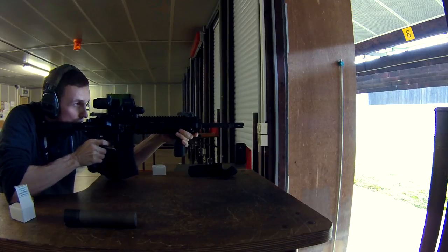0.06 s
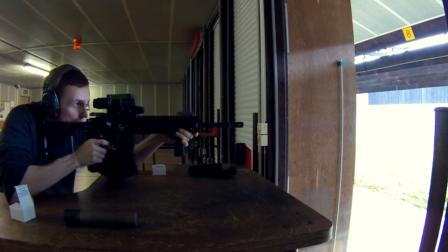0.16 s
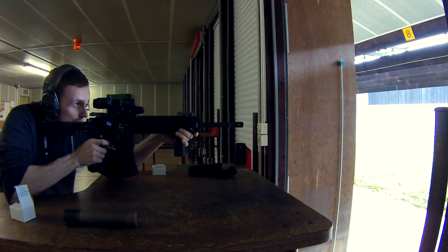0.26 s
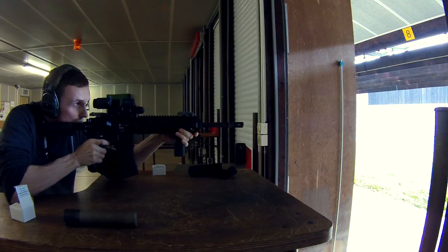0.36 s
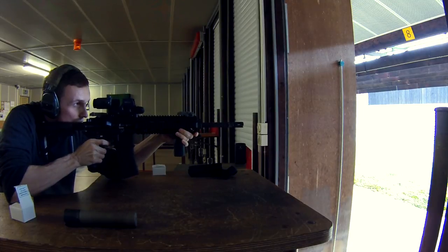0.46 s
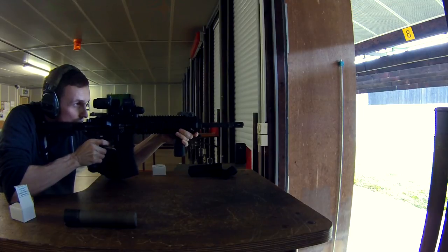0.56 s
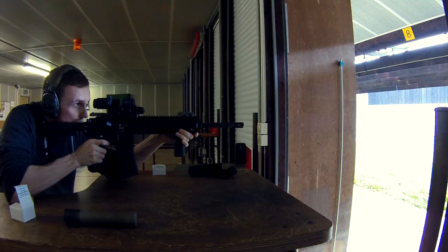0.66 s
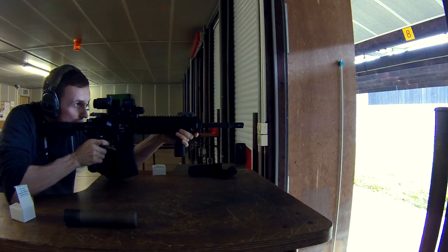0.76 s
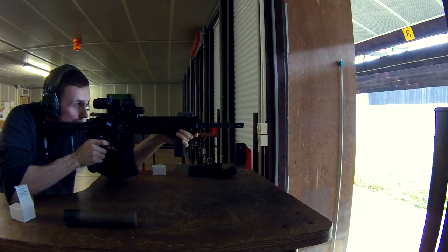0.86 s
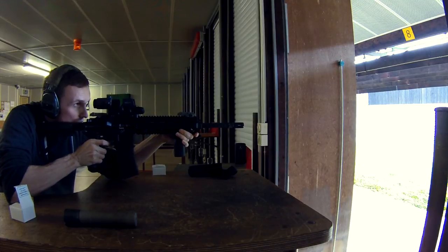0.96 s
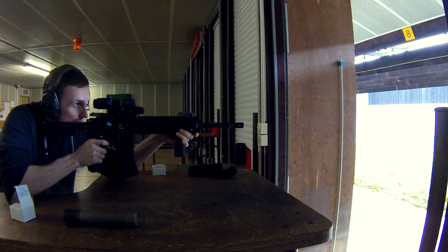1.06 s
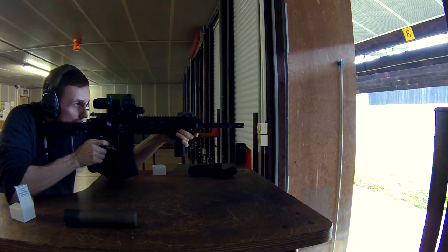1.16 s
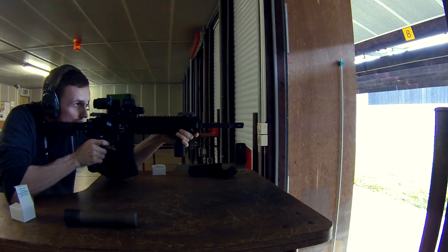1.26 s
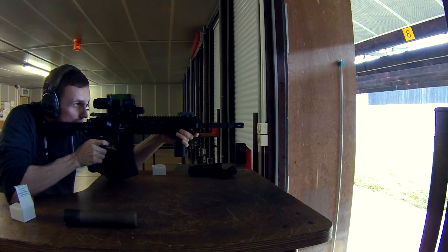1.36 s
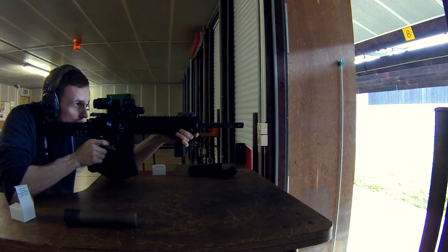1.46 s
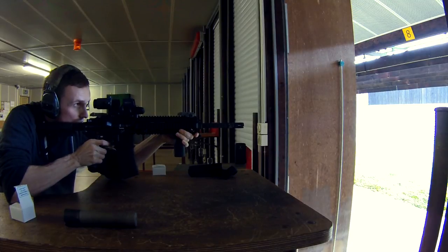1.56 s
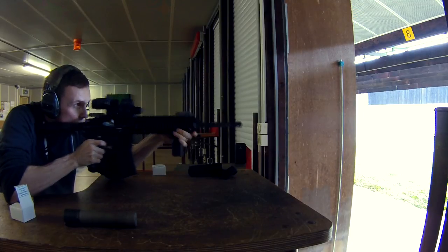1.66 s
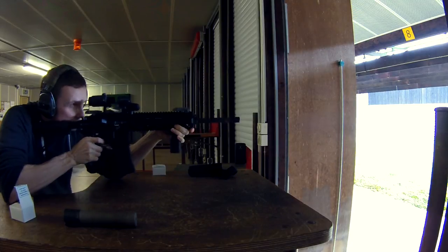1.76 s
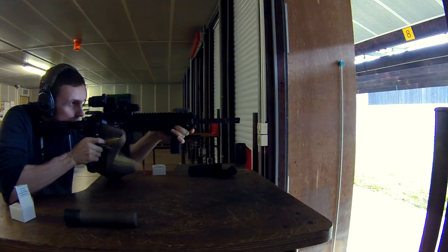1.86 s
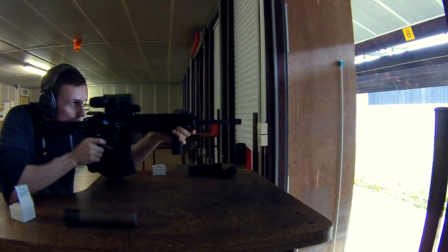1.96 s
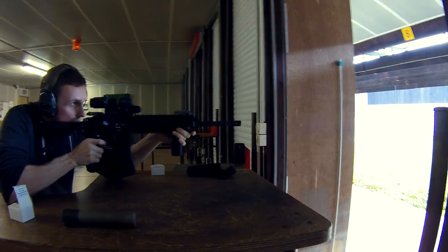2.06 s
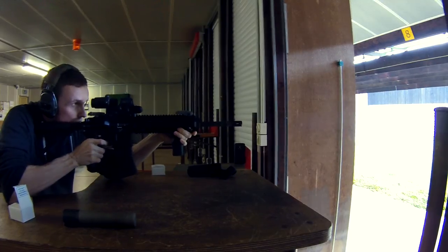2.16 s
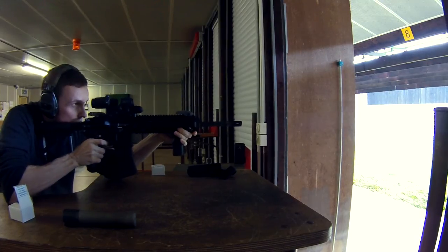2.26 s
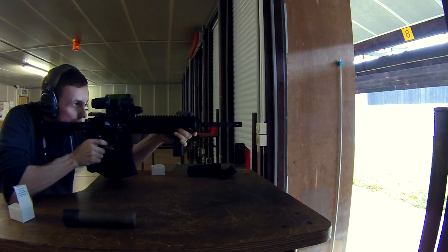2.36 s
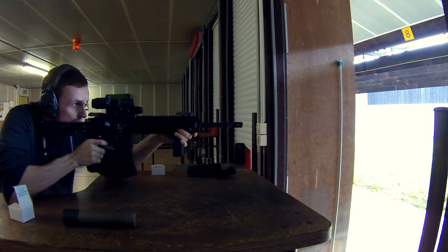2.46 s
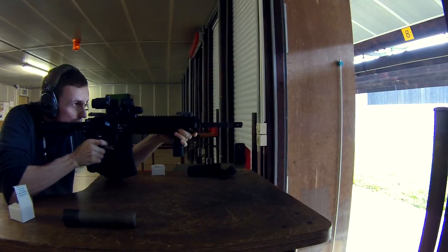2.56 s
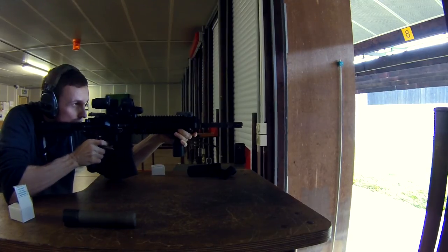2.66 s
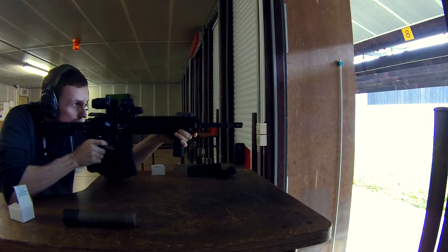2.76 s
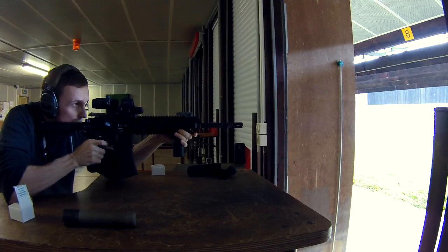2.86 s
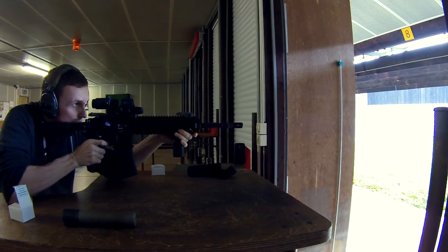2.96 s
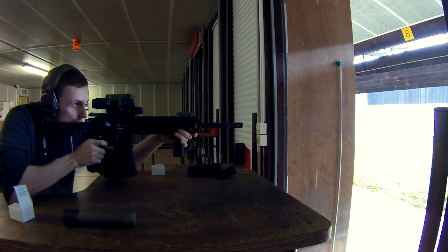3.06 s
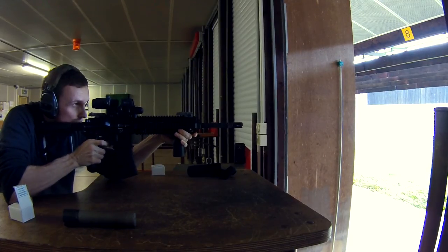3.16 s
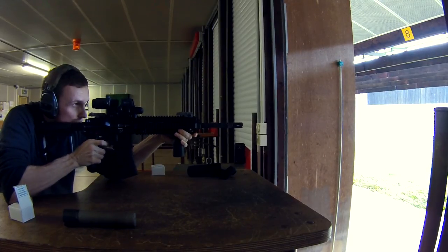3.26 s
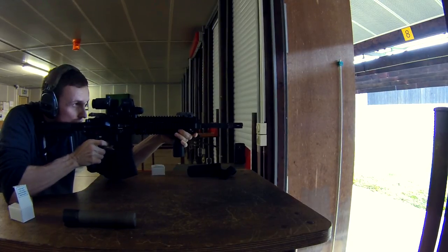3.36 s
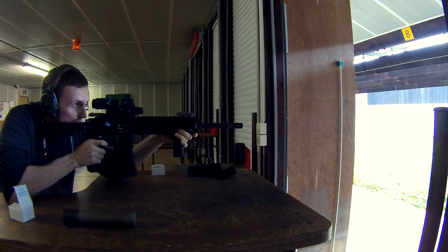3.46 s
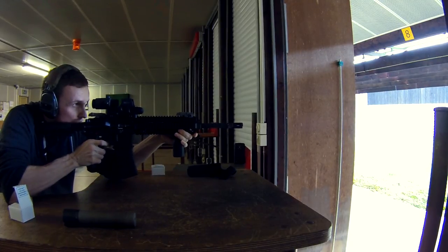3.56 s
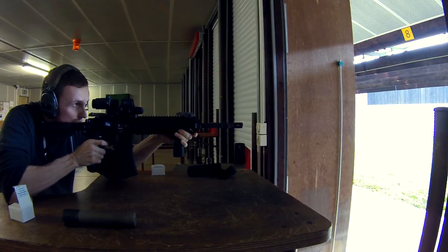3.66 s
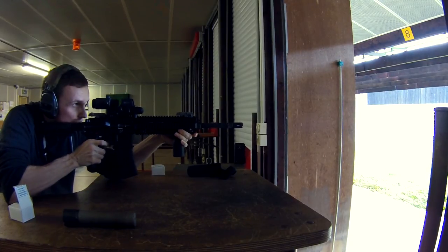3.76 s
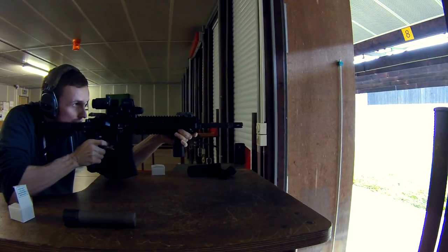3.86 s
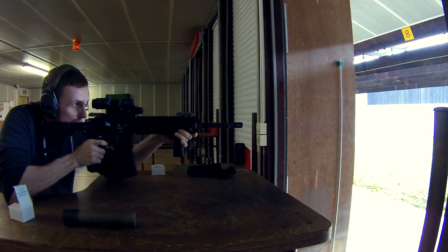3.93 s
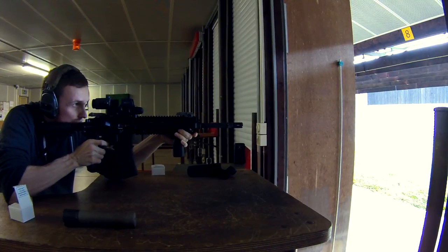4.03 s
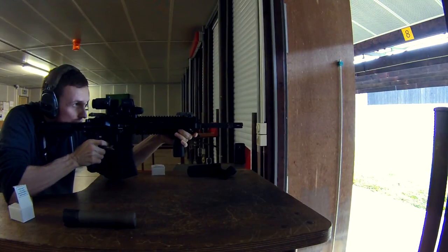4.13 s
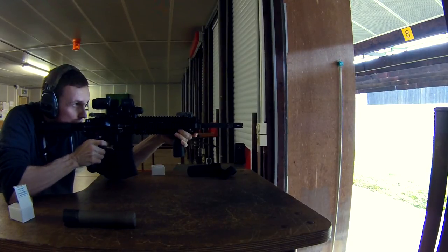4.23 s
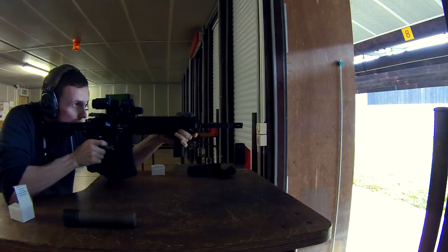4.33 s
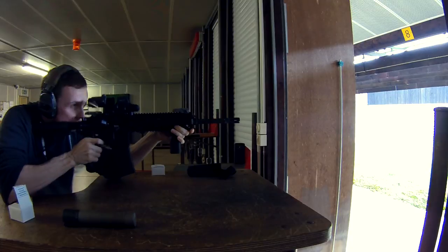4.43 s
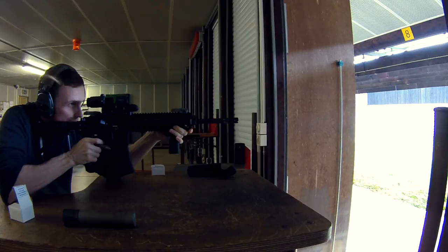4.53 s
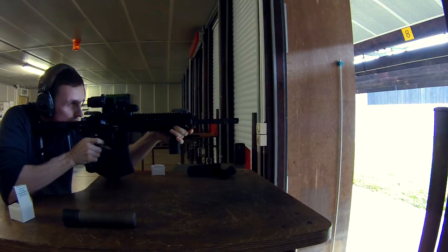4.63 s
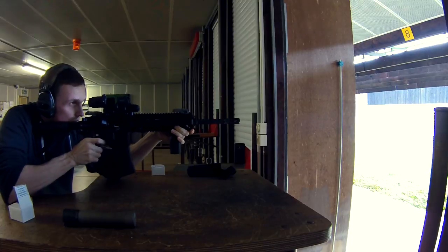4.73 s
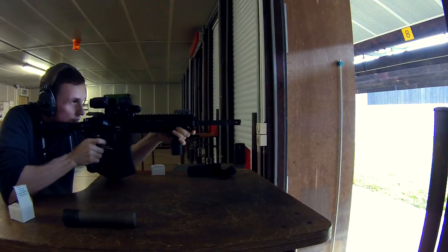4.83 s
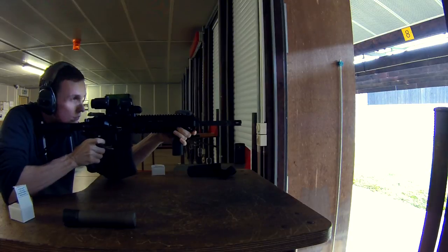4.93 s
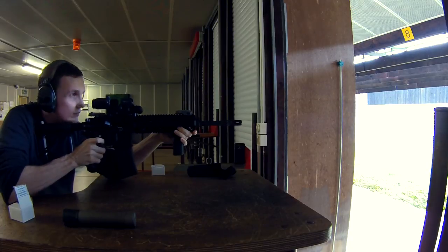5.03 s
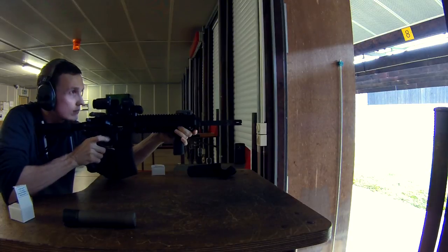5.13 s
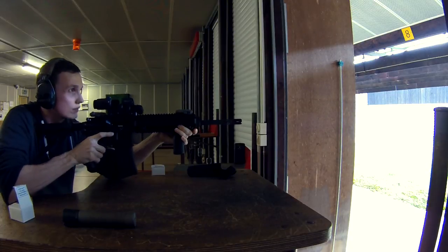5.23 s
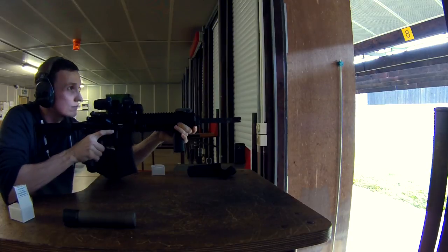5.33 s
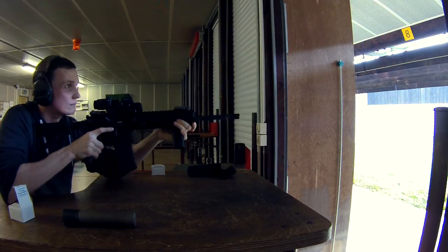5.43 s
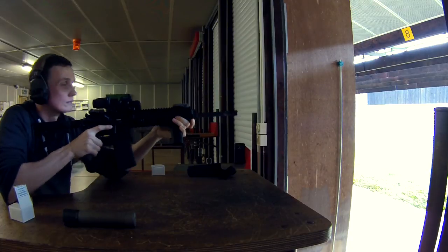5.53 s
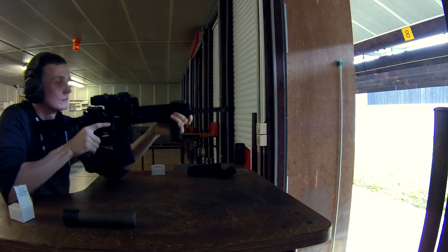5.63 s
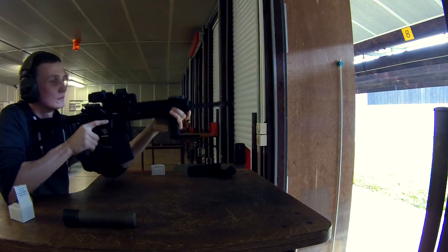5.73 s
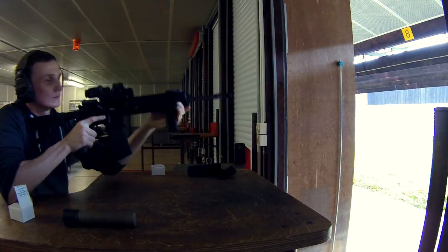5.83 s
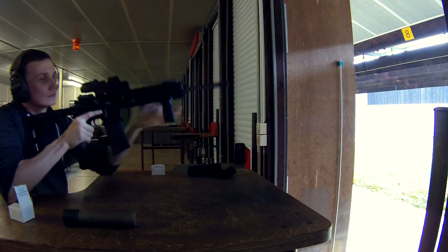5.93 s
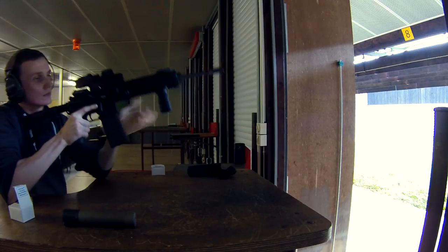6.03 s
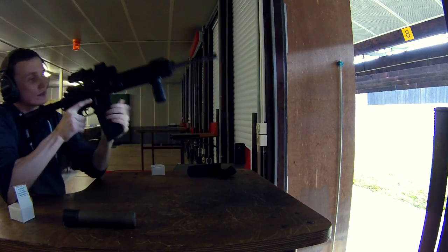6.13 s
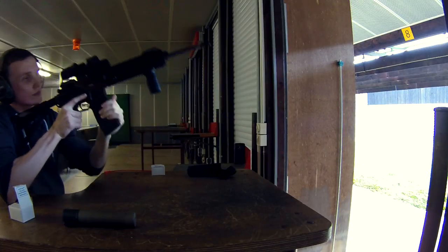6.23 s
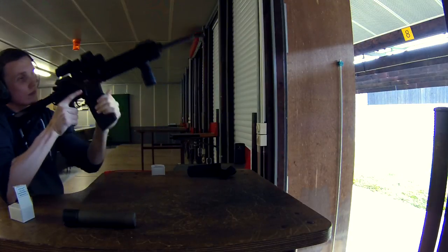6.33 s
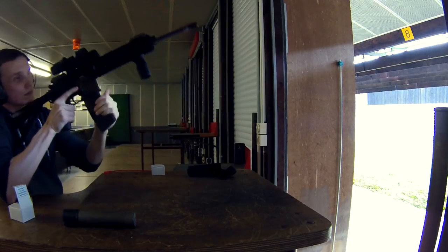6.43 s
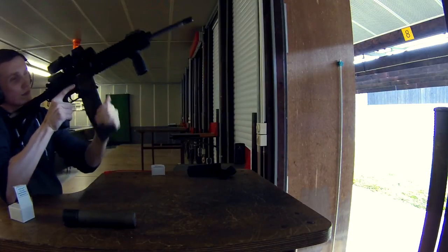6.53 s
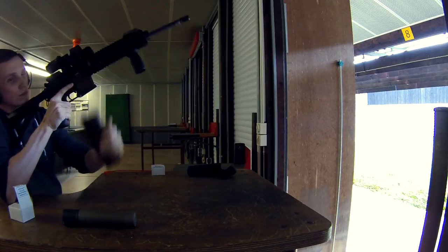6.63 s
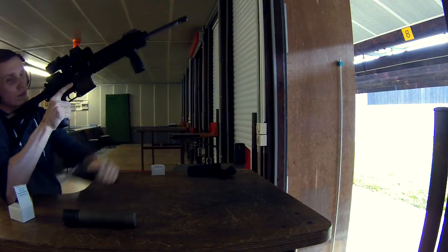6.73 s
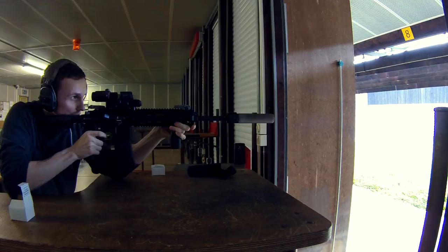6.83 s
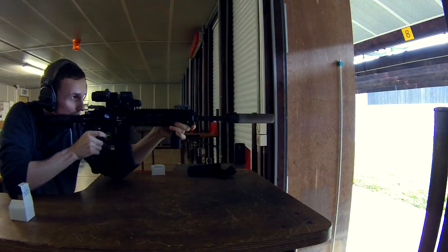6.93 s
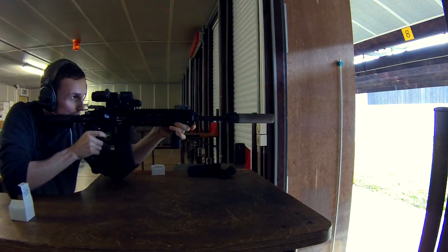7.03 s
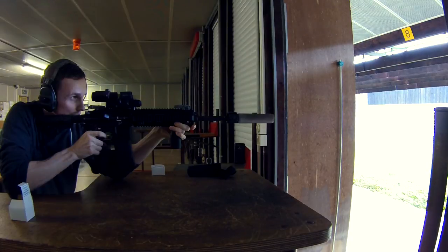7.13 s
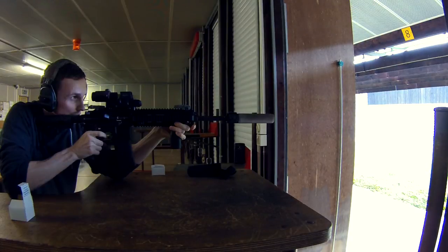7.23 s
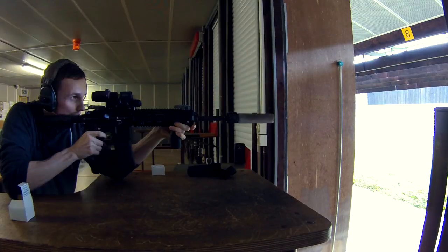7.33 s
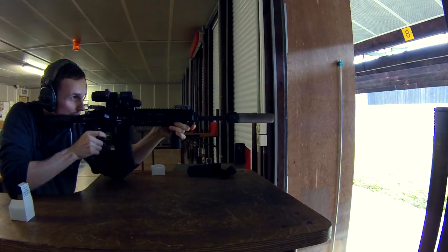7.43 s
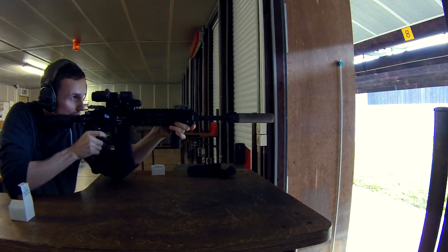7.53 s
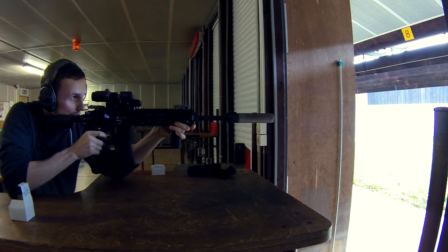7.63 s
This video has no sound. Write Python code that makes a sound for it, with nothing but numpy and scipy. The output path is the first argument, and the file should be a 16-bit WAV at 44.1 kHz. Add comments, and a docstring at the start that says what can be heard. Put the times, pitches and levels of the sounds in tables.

```python
"""Two rifle shots from a bench in a covered range, each loud enough to overload the microphones.
The hall booms as its standing waves decay, and baffles down the range throw back sharp noise-burst echoes.
Each spent case bounces on boards: damped noise for its ticks and knocks, a decaying sine for its brass.
Then the magazine is released and drawn out, as grating noise, and the steel of the rifle clacks once more.
Behind them lie the air of the hall, a low rumble and one faint shuffle, all of coloured noise."""
import sys
import numpy as np
from scipy import signal
from scipy.fft import rfft, irfft
from scipy.io import wavfile
from scipy.ndimage import uniform_filter1d

SR = 44100
rng = np.random.default_rng(int(sys.argv[2]) if len(sys.argv) > 2 else 0)


def output_pcm(signal):
    """Save a mono or channel-first signal as 16-bit PCM at the path in sys.argv[1].

    Samples are clipped to [-1, 1] before scaling.
    """
    pcm = np.clip(np.atleast_2d(signal).T, -1, 1) * 32767
    wavfile.write(sys.argv[1], SR, np.round(pcm).astype(np.int16))


N = 339129


# The two shots. Each row: time in seconds, relative level in dB, relative level of its echoes in dB.
SHOTS = [(1.6611, 0, 3), (4.3811, 0, 3.5)]
# Colour of an echo. Each row: frequency in Hz, relative spectrum level in dB.
ECHO_COLOUR = [(200, -24.5), (900, 2.5), (2400, -5), (3300, 4), (4700, 6), (5700, -18), (12000, -55)]
# One duller echo from the far end of the range.
# The row: delay in seconds, relative level in dB, t60 in seconds, brightness in dB an octave.
END_ECHO = (.301, -16.5, .09, -4.5)
# Stereo balance of distant sounds. Each row: frequency in Hz, left minus right in dB.
FAR_SIDE = [(110, 1.24), (380, -1), (900, 5), (2400, 3.5), (4400, 12.5), (6000, 0.5), (8000, -9.5),
            (11000, -12), (15000, -8.5)]


def shots(boom_delay=.11, ground_delay=.0105, ground_db=-5):
    """Superposition: direct crack, hall response and discrete reflections, each baffle also by way of the ground."""
    out = np.zeros((2, N))
    report = blast()  # fired from one spot, both shots wake the same response
    add(report, boom_delay, boom())
    for s, db, echoes_db in SHOTS:
        add(out, s, amp(db) * report)
        crack = burst(STEEL_COLOUR, NEAR_SIDE, db=-1.5, t60=.013, rise=.00026, room_db=-42, room_t60=.1)
        add(out, s, crack)
        for delay, echo_db in baffle_echoes():
            echo = burst(ECHO_COLOUR, FAR_SIDE, echoes_db + echo_db, t60=.017, rise=.0004,
                         room_db=-26, room_t60=.12)
            add(out, s + delay, echo)
            add(out, s + delay + ground_delay, amp(ground_db) * echo)
        delay, echo_db, t60, bright_db = END_ECHO
        end_echo = burst(tilted(ECHO_COLOUR, bright_db), FAR_SIDE, echoes_db + echo_db, t60, rise=.003,
                         room_db=-26, room_t60=.12)
        add(out, s + delay, end_echo)
    return out


# The blast in the hall. Each row: frequency in Hz, early level in dB, time to swell in seconds,
# tail level in dB, tail t60 in seconds.
BLAST = [(25, -45.5, .008, -59, 1.3), (45.5, -50, .06, -46, 1.1), (71, -18.5, 0.1, -17.5, 0.95),
         (125, -10, 0.16, -22.5, 0.93), (231.7, -12, 0.07, -24.5, 1.2), (486, -9.5, .06, -17.5, 1.12),
         (884, -9.5, 0.028, -16.5, 0.96), (2000, -15, 0.016, -24, 1.2), (4270, -9.5, 0.014, -17, 1.2),
         (6660, -13.8, .006, -23.5, .82), (10000, -6, .005, -16, .7), (15000, -17, .004, -46, .5)]


def blast(start_db=-17, hold=.1, sag_db=-11, drop_t60=.15, build=.13):
    """Swell, hold and drop: each third octave swells at its own rate, sags for a moment, then drops sharply and
    leaves a slowly building tail."""
    t = seconds(2)
    hz, spectrum = noise_spectrum(len(t), FAR_SIDE)
    out = np.zeros((2, len(t)))
    for centre in 25 * 2 ** (np.arange(29) / 3):
        octaves = np.log2((hz + 1e-3) / centre)
        band = np.cos(np.pi / 2 * np.clip(3 * octaves, -1, 1))
        peak_db, swell, late_db, t60 = read(BLAST, centre)
        swelling = amp(start_db * np.maximum(1 - t / swell, 0))
        sag = sag_db * np.maximum(t - swell, 0) / hold
        early = amp(peak_db + sag) * dying(np.maximum(t - hold, 0), drop_t60)
        late = amp(late_db) * dying(t, t60) * (1 - np.exp(-t / build))
        envelope = swelling * np.hypot(early, late)  # powers add
        out += envelope * evened(irfft(spectrum * band, len(t)))
    return out


# Standing waves of the hall. Each row: frequency in Hz, relative level in dB, t60 in seconds.
HALL_MODES = [(66, -16.5, 1.0), (78, -17, 1.0), (102, -19, .9), (111, -12, .9), (170, -23, .9),
              (207, -10.3, .9), (324, -26, 1.1), (440, -31, 1.3), (511, -31, 1.3), (656, -31, 1.1),
              (718, -31, 1.1), (806, -31, 1.1)]


def boom(rise=.055, spread=.57):
    """Modal decay: standing waves build up and hum on, a little out of phase between the microphones."""
    t = seconds(2)
    out = np.zeros((2, len(t)))
    for k, (hz, db, t60) in enumerate(HALL_MODES):
        lag = (-1) ** k * np.array([[0], [spread]])  # radians, left and right
        phase = 2 * np.pi * rng.random() + lag
        out += amp(db) * dying(t, t60) * np.sin(2 * np.pi * hz * t + phase)
    return out * (1 - np.exp(-t / rise)) * amp([[-.8], [.8]])


def baffle_echoes(count=7, last_near=3, first_s=.243, step_s=.0675, near_db=-15.5, far_loss_db=6.8):
    """Periodic reflection: delays (s) and levels (dB) of even baffles, alike up to last_near, then fading."""
    return [(first_s + k * step_s, near_db - far_loss_db * max(k - last_near, 0)) for k in range(count)]


# Hammer, magazine catch and other clicks. Each row: time in seconds, relative level in dB, t60 in seconds,
# low knock in dB, brightness in dB an octave.
CLICKS = [(1.6525, -29, .046, -85, 1), (4.372, -40, .038, -55, 1), (5.992, -39, .079, -65, 1),
          (5.999, -32, .028, -40, .5), (6.367, -26, .1, -57, 0), (6.377, -5, .018, -38, -1.2),
          (6.555, -20.5, .07, -35, -4), (6.896, -28, .035, -24.5, 1), (6.9017, -19.5, .033, -28.5, 2)]
# A light touch sets the steel singing. The row: time in seconds, level in dB, t60 in seconds.
TOUCH = (3.42, -66, .6)
# Resonances of the rifle's steel. Each row: frequency in Hz, width in Hz, lift in dB.
STEEL_MODES = [(1200, 140, 10.5), (1650, 70, 5.5), (2334, 6.1, 17), (2740, 11, 14), (3163, 14, 15),
               (4060, 30, 8), (5750, 90, 8), (6520, 40, 9)]
# Colours of struck and of scraped steel. Each row: frequency in Hz, relative spectrum level in dB.
STEEL_COLOUR = [(100, -29), (450, -14), (750, 1), (1000, 2.5), (1700, -4), (2500, -9.5), (3700, 4.5),
                (6500, -11), (10000, -4.5), (15000, -16)]
SCRAPE_COLOUR = [(200, -30), (450, -8), (700, -8.5), (1150, -6), (1700, -7), (2500, -14), (4100, -3),
                 (5500, -12.5), (6500, -16), (8000, -10.5), (10300, -5), (14000, -15), (15000, -26)]
# Stereo balance of close sounds. Each row: frequency in Hz, left minus right in dB.
NEAR_SIDE = [(110, 3.5), (400, -1.5), (1300, 1), (2400, 4), (4400, 12), (6000, -2.5), (8000, -12.5),
             (11000, -8), (15000, -3.5)]


def rifle(ring_rise=.01, lowest_hz=420):
    """Impact and friction excite modes: steel parts snap home and the magazine grates along its well."""
    out = np.zeros((2, N))
    no_bass = signal.butter(2, lowest_hz, "highpass", fs=SR, output="sos")  # small parts radiate little bass
    for s, db, t60, knock_db, bright_db in CLICKS:
        snap = burst(tilted(STEEL_COLOUR, bright_db), NEAR_SIDE, db, t60, rise=.00019,
                     room_db=-41.5, room_t60=.2, modes=STEEL_MODES)
        add(out, s, signal.sosfilt(no_bass, snap))
        knock = burst(KNOCK_COLOUR, NEAR_SIDE, knock_db, t60, rise=.003, room_db=-32, room_t60=.2)
        add(out, s, knock)
    s, db, t60 = TOUCH
    for hz, _, _ in STEEL_MODES:
        add(out, s, ring(db, hz, t60, ring_rise, tumble=0, left_db=0))
    scrape = noise(N, SCRAPE_COLOUR, NEAR_SIDE, STEEL_MODES)
    return out + friction() * grain(N, 2.6) * scrape


# Hands and shoulder rub on the rifle, and the magazine is drawn out.
# Each row: start in seconds, length in seconds, relative level in dB, release t60 in seconds.
RUBS = [(3.25, .08, -62, .5), (3.42, .1, -57, .6), (3.57, .04, -53.5, 1.1), (5.82, .14, -57, .4),
        (6.08, .015, -44, .38), (7.08, .04, -63, .3), (7.35, .015, -55, .2)]
DRAW = (6.375, .19, -39.5, .2)


def friction(growth_db_per_s=22):
    """Sliding friction: brief touches, and a long draw that grates harder as it gathers speed."""
    start, length, _, _ = DRAW
    drawn_s = np.clip(np.arange(N) / SR - start, 0, length)
    draw = stroke(*DRAW, attack=.008) * amp(growth_db_per_s * drawn_s)
    return draw + sum(stroke(*rub, attack=.012) for rub in RUBS)


# Bounces of the spent cases. Each row: time in seconds, relative tick level in dB,
# tick brightness in dB an octave, knock of the boards in dB, ring of the brass in dB.
BOUNCES = [(2.0094, -15, 12, -9, -28), (2.353, -20, -1, -24, -61), (2.608, -32, -1, -45, -70),
           (2.617, -30.5, -3, -29, -68), (2.737, -33.5, 0, -55, -43), (4.942, -17.5, 10, -27, -26.5),
           (5.093, -16.5, 3, -14, -52), (5.419, -26.5, 1.5, -21.5, -37.5), (5.554, -28.5, 3, -32.5, -48)]
# Each case at last chatters to rest. Each row: time in seconds, first gap in seconds, first tick in dB,
# first knock in dB, first ring in dB, pitch of its ring in Hz.
CASES = [(2.831, .046, -37.5, -68, -47, 11590), (5.655, .056, -38, -32, -45.5, 11520)]
# The first case glances off metal. The row: time in seconds, level in dB, pitch in Hz, t60 in seconds.
PING = (2.0094, -1.5, 6020, .26)
# The last case rolls. The row: start in seconds, length in seconds, relative level in dB, release t60 in seconds.
ROLL = (5.645, .02, -46.5, 1.2)
# Colour of rolling on boards. Each row: frequency in Hz, relative spectrum level in dB.
BOARDS_COLOUR = [(200, -22), (450, 1), (650, 2.5), (900, -18), (1150, 4), (2200, -14), (4800, -19),
                 (9000, -40)]


def cases(hops=5, hop_share=.89, hop_bright_db=1.6):
    """Inelastic bouncing: every hop of a settling case is shorter and weaker than the one before."""
    tick_loss_db, knock_loss_db, ring_loss_db = 4, 14, 2.6  # per hop
    out = np.zeros((2, N))
    for s, *blow in BOUNCES:
        after_second_shot = int(s > SHOTS[1][0])
        ring_hz = CASES[after_second_shot][-1]
        add(out, s, landing(*blow, ring_hz))
    for s, gap, tick_db, knock_db, ring_db, ring_hz in CASES:
        for k in range(hops):
            hop = landing(tick_db - k * tick_loss_db, hop_bright_db, knock_db - k * knock_loss_db,
                          ring_db - k * ring_loss_db, ring_hz)
            add(out, s, hop)
            s += gap * hop_share ** k
    add(out, PING[0], ring(*PING[1:], rise=.004, tumble=0))
    rolling = noise(N, BOARDS_COLOUR, NEAR_SIDE, BOARD_MODES)
    return out + stroke(*ROLL, attack=.008) * grain(N, 4.7) * rolling


# Colours of a brass tick and of a low knock. Each row: frequency in Hz, relative spectrum level in dB.
TICK_COLOUR = [(100, -31), (400, -14), (1300, 16), (2800, 6), (4600, 7.5), (7000, -8.5), (10000, -5.5),
               (15000, -29)]
KNOCK_COLOUR = [(80, -26.5), (220, -8), (420, 4), (750, -5), (1300, -6), (2300, -9), (3200, -22),
                (12000, -48.5)]
# Resonances of the boards. Each row: frequency in Hz, width in Hz, lift in dB.
BOARD_MODES = [(420, 120, 3), (685, 65, 15), (1190, 70, 3.5), (1707, 55, 9), (2062, 59, 10.7),
               (2590, 103, 8.1)]


def landing(tick_db, bright_db, knock_db, ring_db, ring_hz, second_end=.0053, second_db=-4, knock_delay=.018):
    """Coupled impact: a case lands on one end, then the other, and rings; the boards answer with a knock."""
    out = ring(ring_db, ring_hz, t60=.33, rise=.006, tumble=.65)
    colour = tilted(TICK_COLOUR, bright_db)
    first = burst(colour, NEAR_SIDE, tick_db, t60=.044, rise=.00037, room_db=-24.5, room_t60=.3, grain_db=1.5)
    second = burst(colour, NEAR_SIDE, tick_db + second_db, t60=.075, rise=.0005,
                   room_db=-21, room_t60=.33, grain_db=4)
    add(out, 0, first)
    add(out, second_end, second)
    wood = tilted(KNOCK_COLOUR, .12 * (knock_db + 24))  # knocks harder than -24 dB are brighter
    knock = burst(wood, NEAR_SIDE, knock_db, t60=.048, rise=.002, room_db=-29, room_t60=.6,
                  modes=BOARD_MODES, grain_db=0)
    add(out, knock_delay, knock)
    return out


def ring(db, hz, t60, rise, tumble, left_db=-7, lead=1.2, throbs_hz=21):
    """Damped vibration: one partial of struck metal, by default louder on the right, throbbing as it tumbles."""
    t = seconds(.7)
    turning = 1 - np.clip(tumble, 0, 1) * np.sin(np.pi * throbs_hz * t) ** 2
    phase = 2 * np.pi * hz * t
    partial = np.array([amp(left_db) * np.sin(phase - lead), np.sin(phase)])
    return amp(db) * turning * dying(t, t60) * (1 - np.exp(-t / rise)) * partial


# A distant rumble swells. Each row: start in seconds, length in seconds, level in dB added to the steady level.
SWELLS = [(1, .55, -54.5), (3.45, .25, -55.5), (6.15, .68, -55)]
# A shuffle further back. The row: start in seconds, length in seconds, level in dB, release t60 in seconds.
SHUFFLE = (.358, .035, -45.5, .47)
# Colours of air, rumble and shuffle. Each row: frequency in Hz, relative spectrum level in dB.
AIR_COLOUR = [(15, -53), (25, -24), (38, -13), (55, -7.5), (140, -13.5), (301, -17.5), (335, -14),
              (383, -15.5), (604, -17.5), (673, -15.5), (833, -17), (3180, -29), (5010, -33.5),
              (6900, -36.5), (13800, -39.5), (15000, -43.5)]
RUMBLE_COLOUR = [(20, -32), (42, -20), (54, 0), (75, -8.5), (130, -15), (260, -34), (1000, -69.5)]
SCUFF_COLOUR = [(70, -2), (140, 6), (260, -5), (500, -8), (1000, -7), (1500, 5.5), (2500, -10), (4200, 1),
                (6500, -16.5), (10000, -15), (13000, -32)]
# Stereo balance of the background. Each row: frequency in Hz, left minus right in dB.
AIR_SIDE = [(60, -0.5), (180, -1.5), (540, 0.5), (1640, 0.71), (4950, 0.5), (14900, -2.0)]


def hall(air_db=-55.5, rumble_db=-62):
    """Stationary background noise: still air and a low rumble, with one faint shuffle."""
    air = amp(air_db) * noise(N, AIR_COLOUR, AIR_SIDE)
    rumble_gain = amp(rumble_db) + sum(stroke(*swell, t60=.9, attack=.07) for swell in SWELLS)
    rumble = rumble_gain * noise(N, RUMBLE_COLOUR, AIR_SIDE)
    shuffle = stroke(*SHUFFLE, attack=.012) * noise(N, SCUFF_COLOUR, FAR_SIDE)
    return air + rumble + shuffle


def burst(colour, side, db, t60, rise, room_db, room_t60, modes=(), grain_db=2):
    """Impulsive excitation: a short dense rattle of set energy, with its faint wash in the hall."""
    t = seconds(.5)
    sound = (1 - np.exp(-t / rise)) * noise(len(t), colour, side, modes)
    decay = dying(t, t60)
    rattle = sound * decay * grain(len(t), grain_db)
    rattle *= np.sqrt(np.mean(decay ** 2) / np.mean(rattle ** 2))
    wash = amp(room_db) * dying(t, room_t60) * sound
    return amp(db - 2.5) * (rattle + wash)


# Likeness of the two microphones. Each row: frequency in Hz, correlation from 0 to 1.
LIKENESS = [(60, .75), (150, .92), (300, .88), (600, 0.78), (1200, .25), (2500, .03), (15000, 0)]


def noise_spectrum(size, side):
    """Spatial coherence: white noise is alike in both microphones in the bass, independent in the treble."""
    hz = np.fft.rfftfreq(size, 1 / SR)
    a, b = rfft(rng.standard_normal((2, size)))
    same = np.clip(read(LIKENESS, hz), -1, 1)
    tilt = amp(read(side, hz))
    left, right = tilt * a, same * a + np.sqrt(1 - same ** 2) * b
    return hz, np.array([left, right]) / np.sqrt(1 + tilt ** 2)


def noise(size, colour, side, modes=()):
    """Source and resonator: coloured stereo noise of rms 1, lifted at each resonance."""
    hz, spectrum = noise_spectrum(size, side)
    body = 1 + sum((amp(db) - 1) / (1 + 2j * (hz - f) / width) for f, width, db in modes)
    return evened(irfft(spectrum * amp(read(colour, hz)) * body, size))


def grain(size, depth_db):
    """Amplitude modulation by uneven contact: a gain of rms 1 that flutters over about a millisecond."""
    flutter = evened(uniform_filter1d(rng.standard_normal(size), size=50))
    return evened(amp(depth_db * flutter))


def tilted(colour, slope_db):
    """Spectral tilt: a colour made brighter by so many dB an octave, about 3 kHz."""
    return [(f, db + slope_db * np.log2(f / 3000)) for f, db in colour]


def stroke(start, length, db, t60, attack):
    """Attack, hold and release: a gain that grows exponentially until start, holds, then dies away."""
    t = np.arange(N) / SR - start
    growth = np.exp(np.minimum(t, 0) / max(attack, 1e-3))
    return amp(db) * growth * dying(np.maximum(t - length, 0), t60)


def dying(t, t60):
    """Exponential decay: the level falls by 60 dB in t60 seconds."""
    return np.exp(-np.log(1000) * t / max(t60, 1e-3))


def amp(db):
    """Logarithmic level: decibels to gain."""
    return 10 ** (np.asarray(db) / 20)


def evened(x):
    """Power normalisation: scales to rms 1."""
    return x / np.sqrt(np.mean(x ** 2) + 1e-20)


def read(points, hz):
    """Interpolation: reads every column of a table on a log-frequency axis."""
    f, *columns = np.transpose(points)
    return np.squeeze([np.interp(np.log(hz + 1), np.log(f + 1), c) for c in columns])


def seconds(length):
    """Uniform sampling: a time axis in seconds."""
    return np.arange(int(length * SR)) / SR


def add(mix, s, sound):
    """Linear superposition: mixes a stereo sound in at time s."""
    part = mix[:, round(s * SR):][:, :sound.shape[1]]
    part += sound[:, :part.shape[1]]


def scene():
    """Superposition of everything that reaches the microphones."""
    return shots() + rifle() + cases() + hall()


def record(dry, full_scale=.97, edge_hz=15400):
    """Saturation, then band limiting: the blasts overload the input, which flattens at full scale."""
    clipped = dry / (1 + (dry / full_scale) ** 6) ** (1 / 6)
    low_pass = signal.firwin(255, edge_hz, window=("kaiser", 8), fs=SR)
    return signal.oaconvolve(clipped, low_pass[None], "same")


dry = scene()
out = record(dry)
output_pcm(out)
```